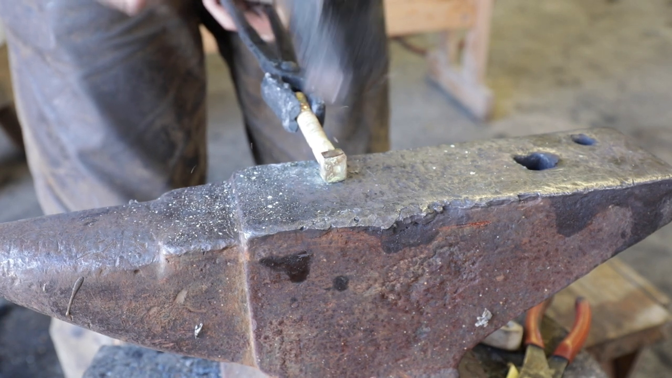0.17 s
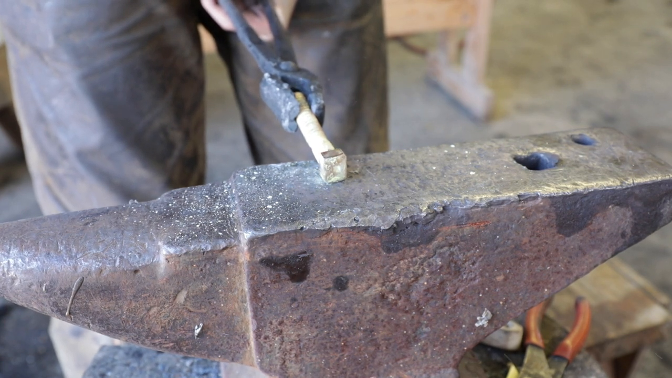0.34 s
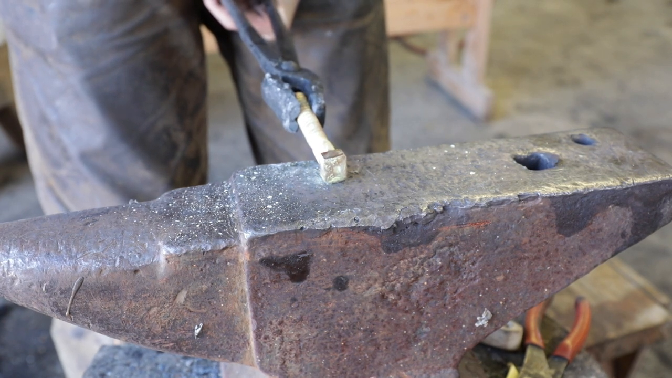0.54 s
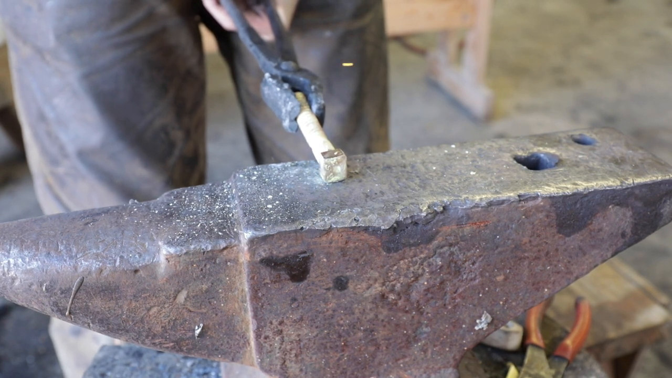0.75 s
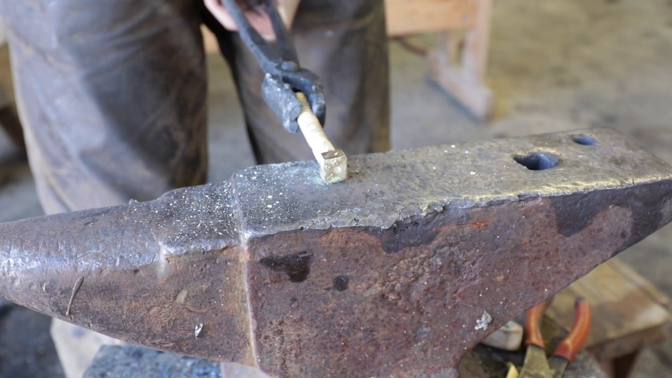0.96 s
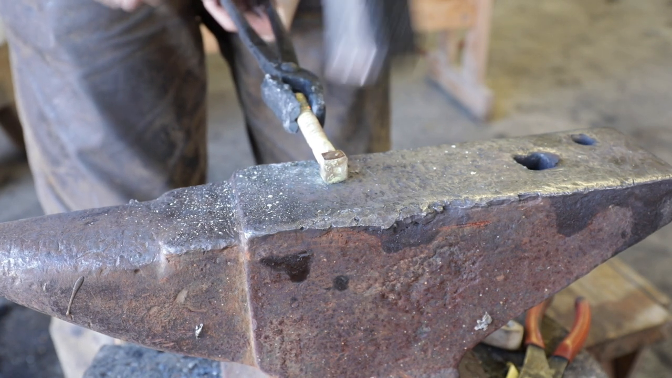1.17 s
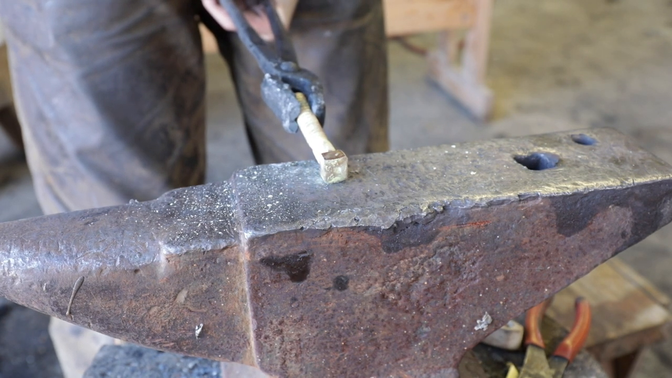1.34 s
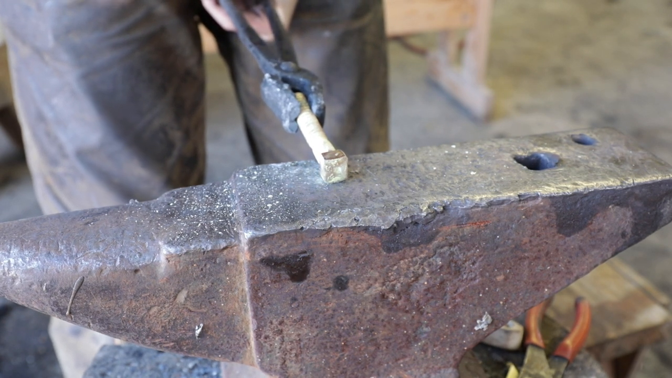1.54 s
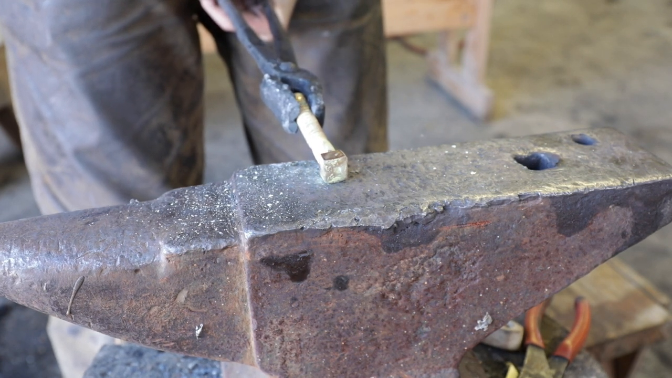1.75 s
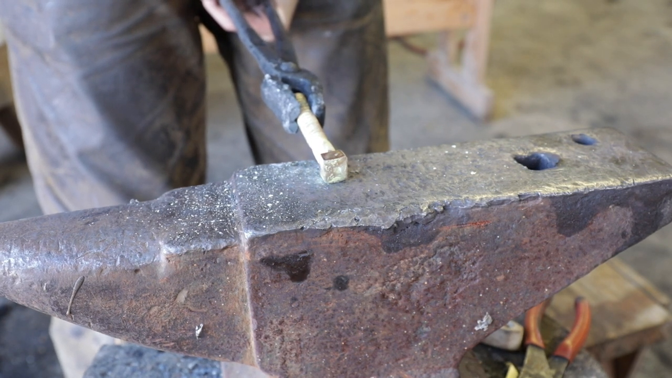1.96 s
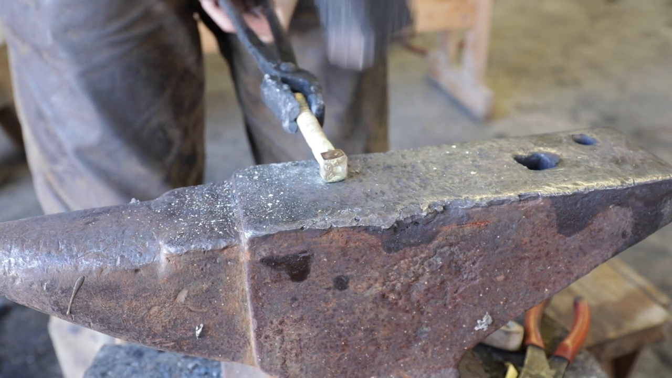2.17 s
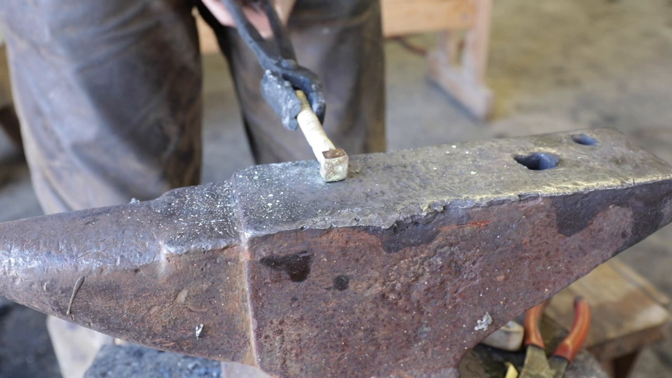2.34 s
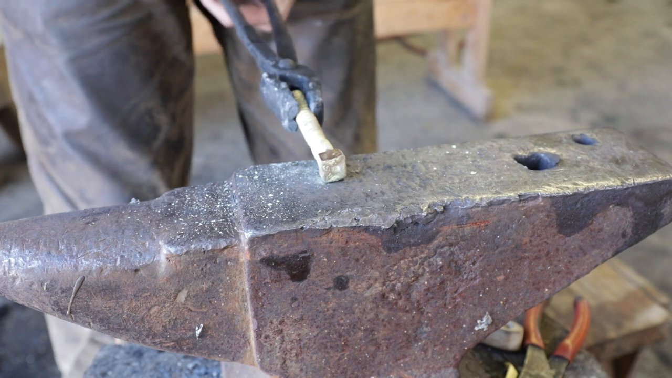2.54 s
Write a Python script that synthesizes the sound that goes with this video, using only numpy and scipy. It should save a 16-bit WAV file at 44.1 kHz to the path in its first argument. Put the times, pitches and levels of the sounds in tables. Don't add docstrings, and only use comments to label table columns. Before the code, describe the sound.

A hammer hits a hot bolt on a steel anvil five times, about twice a second, each a hard smack and clatter with short metallic ring, close to an overloaded small microphone in a reverberant forge.

```python
import sys
import numpy as np
from scipy import signal
from scipy.fft import rfft, irfft
from scipy.io import wavfile
from scipy.ndimage import map_coordinates

SR = 44100
rng = np.random.default_rng(int(sys.argv[2]) if len(sys.argv) > 2 else 0)


def wav_out(sig):
    wavfile.write(sys.argv[1], SR, np.round(np.clip(np.atleast_2d(sig).T, -1, 1) * 32767).astype(np.int16))


def volts_from_db(level):
    exponent = np.asarray(level, float) / 20
    return 10 ** exponent


N = 112455
LEAD = SR // 2

# f/Hz, t60/s
HALL_DECAY = [(50, 0.88), (200, 1), (500, 0.65), (1100, 0.93), (2900, 0.97), (4400, 0.62), (7500, 0.48),
              (14000, 0.21)]
# f/Hz, level/dB
HALL_SPECTRUM = [(40, 2), (300, 18), (1000, 11.5), (1800, 2), (4400, -6.5), (5200, -17), (9000, -20.5),
                 (14000, -31.5)]


def along(points, hz):
    f, v = np.transpose(points)
    return np.interp(np.log(hz + 1), np.log(f + 1), v)


def unit(x):
    return x / np.sqrt(np.mean(x ** 2) + 1e-20)


def dying(size, colour, t60):
    hz, t_s, bins = signal.stft(rng.standard_normal(size), SR, nperseg=128)
    gain = unit(volts_from_db(along(colour, hz)))
    t60_s = np.maximum(along(t60, hz), .01)
    fade = volts_from_db(-60 * t_s / t60_s[:, None])
    return signal.istft(bins * gain[:, None] * fade, SR, nperseg=128)[1][:size]


def ring(pitches_hz, modes, t, wander_rad):
    scatter_db, wander_rate_hz = .5, 40
    out = np.zeros(len(t))
    for hz, (db, t60_s) in zip(pitches_hz, modes):
        walk = np.cumsum(rng.standard_normal(200))
        drift = map_coordinates(walk, [np.clip(t * wander_rate_hz, 0, 199)])
        level = volts_from_db(db + scatter_db * rng.normal() - 60 * t / max(t60_s, .005))
        phase = 2 * np.pi * hz * t + wander_rad * (drift - drift[0])
        out += level * np.sin(phase) * (t >= 0)
    return out


def high_pass(x):
    return signal.sosfilt(signal.butter(2, 3780, "high", fs=SR, output="sos"), x)


def air():
    # f/Hz, density/dB per Hz
    rumble = [(25, -26.5), (50, 2), (100, -9), (300, 1), (1000, -23), (3000, -34), (6000, -61.5),
              (16000, -62)]
    white = rfft(rng.standard_normal(N))
    gain = volts_from_db(along(rumble, np.fft.rfftfreq(N, 1 / SR)))
    return volts_from_db(-51) * unit(irfft(white * gain, N))


def touch():
    t = np.arange(-400, 0) / SR
    return volts_from_db(-30) * np.exp(t / .0008) * rng.standard_normal(len(t))


def smack(t):
    from_hz, to_hz, fall_s, t60_s = 2000, 511, 0.003017, 0.014
    sag = (from_hz - to_hz) * fall_s * (1 - np.exp(-t / fall_s))
    phase = 2 * np.pi * (to_hz * t + sag)
    return volts_from_db(15 - 60 * t / t60_s) * np.sin(phase)


def early_reflections():
    # f/Hz, density/dB per Hz
    reflection_spectrum = [(30, -32.5), (200, -25.5), (450, 8), (900, -9.5), (1800, 3), (4000, -2),
                           (9000, -32.5), (16000, -11)]
    # f/Hz, t60/s
    reflection_decay = [(100, 0.52), (1000, 0.035), (5000, 0.04), (15000, 0.04)]
    return volts_from_db(0.5) * dying(SR, reflection_spectrum, reflection_decay)


def scatter():
    return volts_from_db(-15) * high_pass(dying(SR, HALL_SPECTRUM, HALL_DECAY))


def stand_thump(t):
    stand_hz = [45, 223, 300, 478, 560, 675, 780, 950, 1270]
    # level/dB, t60/s
    stand_modes = [(-6.5, 0.12), (3, .16), (-15.5, 0.22), (-7, 0.06), (-10, .08), (-4, 0.04), (-7.5, 0.065),
                   (-12, 0.033), (-16, .05)]
    return ring(stand_hz, stand_modes, t - 0.001292, 0)


def anvil_ring(t):
    anvil_hz = [1070, 2262, 2550, 2582, 2745, 2768, 3600, 5090]
    # level/dB, t60/s
    anvil_modes = [(-25, 0.18), (0.5, 0.073), (-13.5, 0.338), (5, 0.091), (-16, .2), (5.5, 0.069),
                   (-3.5, .08), (-13.5, .06)]
    rise_s = 0.0044
    return ring(anvil_hz, anvil_modes, t, 0) * (1 - np.exp(-t / rise_s))


def hammer_ring(t):
    hammer_hz = [7402, 7383, 9050, 9635, 10200, 13700]
    # level/dB, t60/s
    hammer_modes = [(-0.5, 0.15), (-14, 0.24), (-28, .08), (-24, 0.12), (-29.5, 0.18), (-32, .1)]
    rise_s, wander_rad = .018, .4
    return ring(hammer_hz, hammer_modes, t, wander_rad) * (1 - np.exp(-t / rise_s))


def blows():
    # t/s, force/dB, hammer ring/dB, brightness/dB
    strikes = [
        (-.285, -3, 6, -22.5),
        (0.2073, -3.5, 4, -9),
        (.7016, -3, -10.5, 1),
        (1.1945, -3, 0, 6.5),
        (1.6864, -4, 1.5, 0),
        (2.175, -3, 2.5, 9),
    ]
    fresh_db = -4.5
    shock_send_db, stand_send_db, anvil_send_db, hammer_send_db = 35, -10, 1.5, 15.5
    t = np.arange(SR) / SR
    out = np.zeros((2, N + LEAD + SR))
    contact = smack(t) + early_reflections()
    for s, force_db, ring_db, bright_db in strikes:
        fresh = volts_from_db(fresh_db + bright_db) * high_pass(early_reflections())
        bright_tail = volts_from_db(bright_db) * scatter()
        stand = stand_thump(t)
        anvil = anvil_ring(t)
        head = volts_from_db(ring_db) * hammer_ring(t)
        near = contact + fresh + stand + anvil + head + bright_tail
        far = volts_from_db(shock_send_db) * (t == 0) + volts_from_db(stand_send_db) * stand
        far = far + volts_from_db(anvil_send_db) * anvil + volts_from_db(hammer_send_db) * head
        crunch = touch()
        start = LEAD + round(s * SR)
        out[0, start - len(crunch):start] += volts_from_db(force_db) * crunch
        out[:, start:start + SR] += volts_from_db(force_db) * np.array([near, far])
    return out[:, :N + LEAD]


def walls(x):
    # delay/s, level/dB
    echoes = [(.005, -15), (.0085, -18.5), (.0125, -18.5), (0.019, -18), (.023, -24)]
    return sum(volts_from_db(db) * np.pad(x, (round(s * SR), 0))[:len(x)] for s, db in echoes)


def hall(x):
    level_db, delay_s, rise_s = -12, 0.0097, 0.004
    t = np.arange(SR * 2) / SR
    rise = 1 - np.exp(-np.maximum(t - delay_s, 0) / rise_s)
    tail = dying(len(t), HALL_SPECTRUM, HALL_DECAY) * rise
    return signal.fftconvolve(x, volts_from_db(level_db) * tail / np.linalg.norm(tail))[:len(x)]


def scene():
    near, far = blows()
    return ((near + walls(near) + hall(far))[LEAD:] + air())[None]


def clip(x, ceiling):
    knee = 7
    return x / (1 + np.abs(x / ceiling) ** knee) ** (1 / knee)


def band_limit(x):
    return signal.sosfilt(signal.butter(12, 16430, fs=SR, output="sos"), x)


def record(dry):
    sag, sag_s, lean, out_gain = .75, .025, .1, 1.1
    low_cut_hz, top_hz = 25, 15900
    keep = np.exp(-1 / (sag_s * SR))
    load = signal.lfilter([1 - keep], [1, -keep], clip(dry, 1) ** 2)
    leaning = clip(dry, 1 - sag * load) - lean * load
    low_cut = signal.butter(1, low_cut_hz, "high", fs=SR, output="sos")
    top_cut = signal.cheby2(10, 50, top_hz + 800, fs=SR, output="sos")
    out = np.clip(out_gain * signal.sosfilt(low_cut, leaning), -1, 1)
    return band_limit(signal.sosfilt(top_cut, out))


dry = scene()
out = record(dry)
wav_out(out)
```